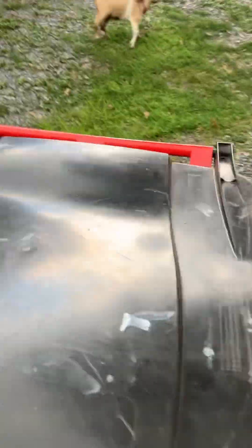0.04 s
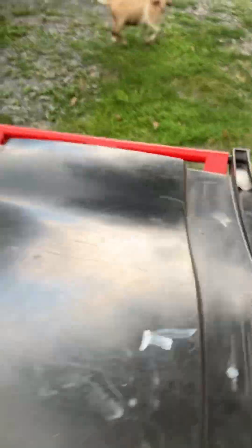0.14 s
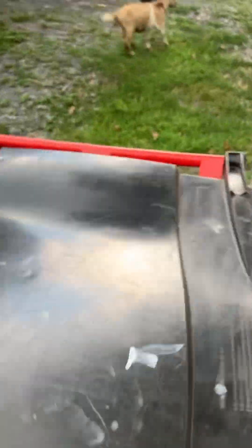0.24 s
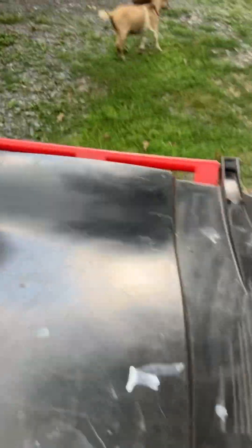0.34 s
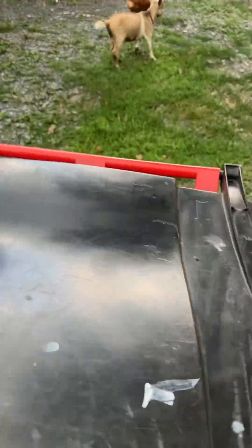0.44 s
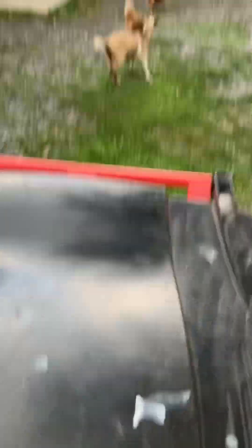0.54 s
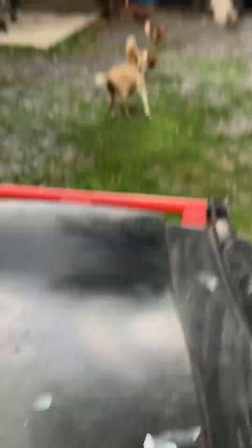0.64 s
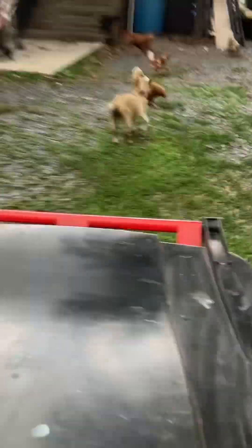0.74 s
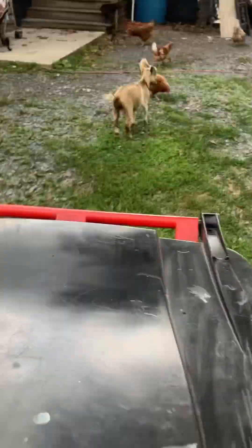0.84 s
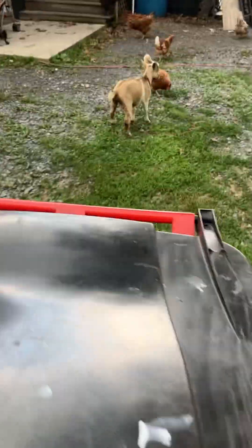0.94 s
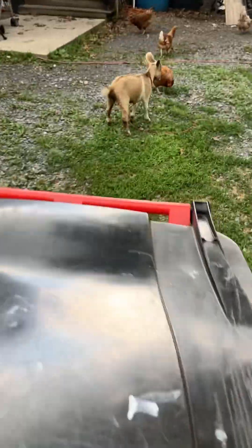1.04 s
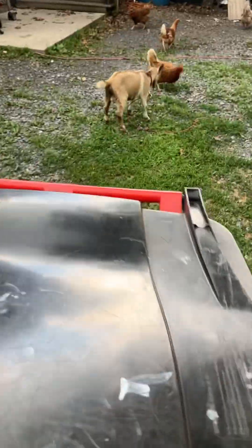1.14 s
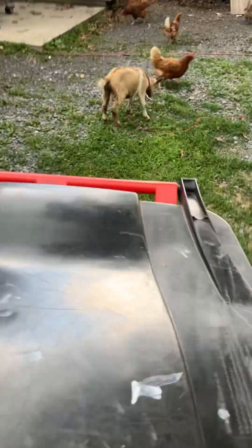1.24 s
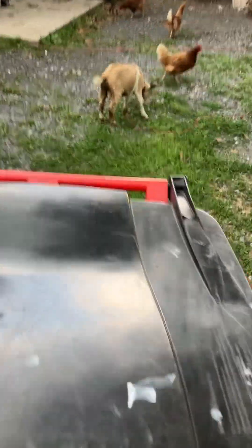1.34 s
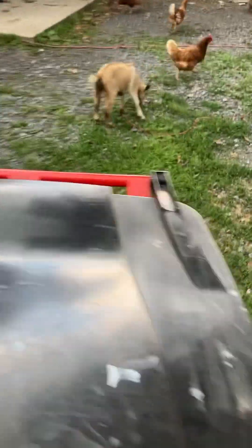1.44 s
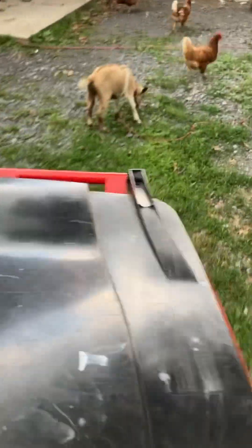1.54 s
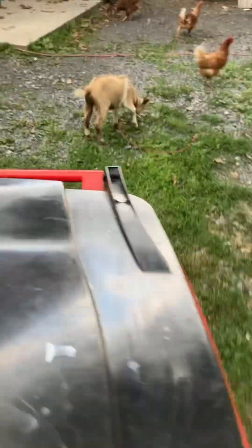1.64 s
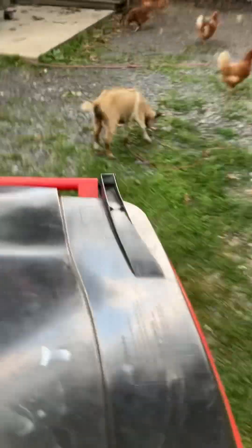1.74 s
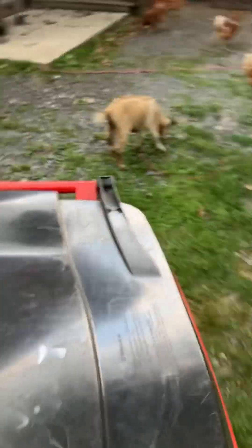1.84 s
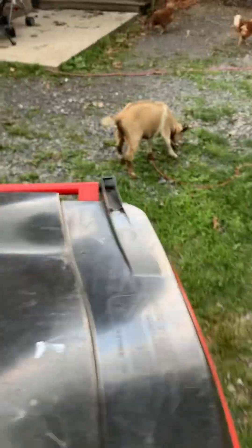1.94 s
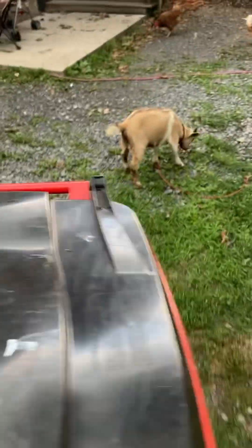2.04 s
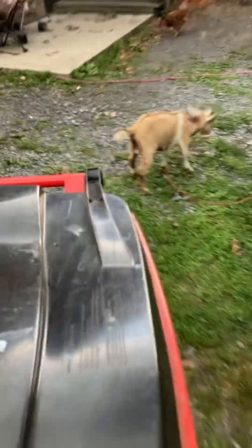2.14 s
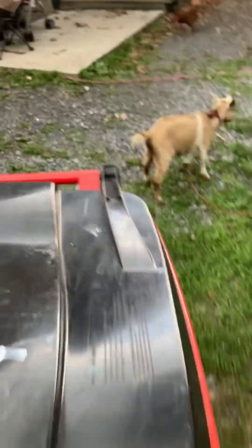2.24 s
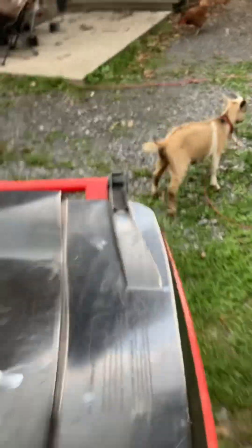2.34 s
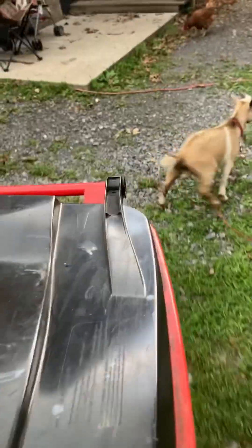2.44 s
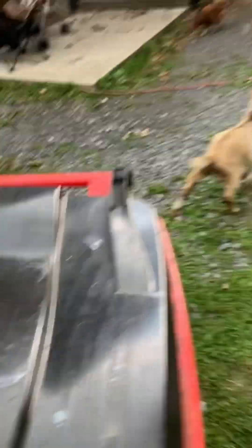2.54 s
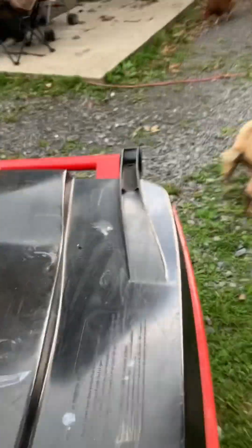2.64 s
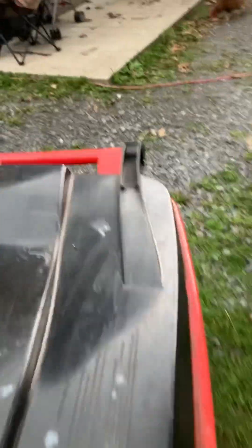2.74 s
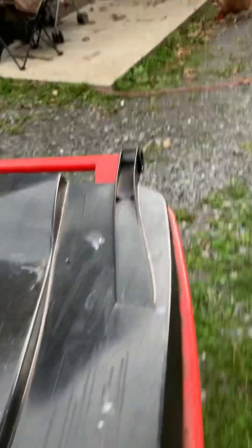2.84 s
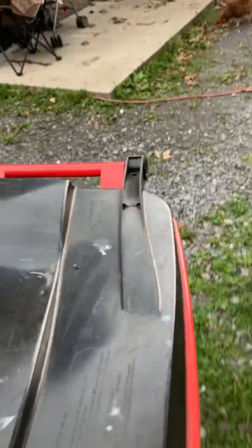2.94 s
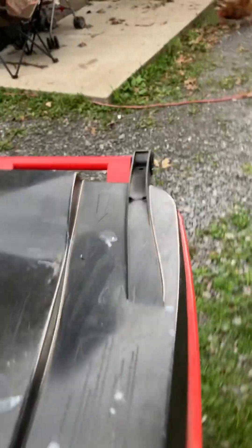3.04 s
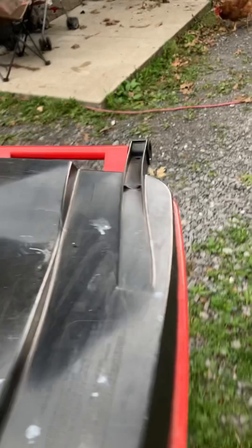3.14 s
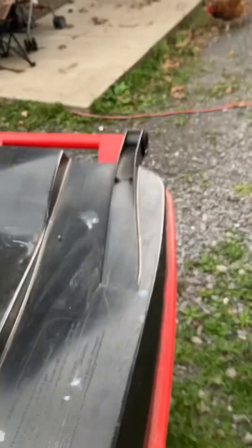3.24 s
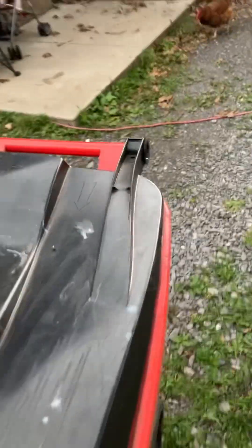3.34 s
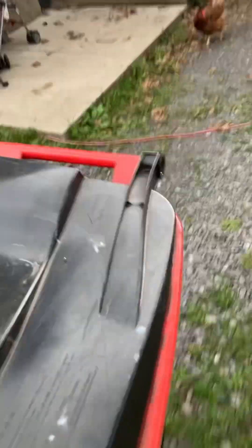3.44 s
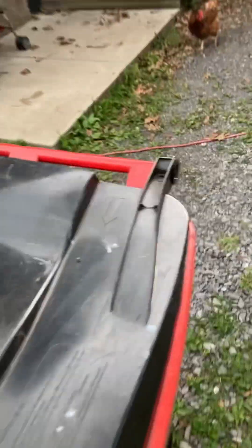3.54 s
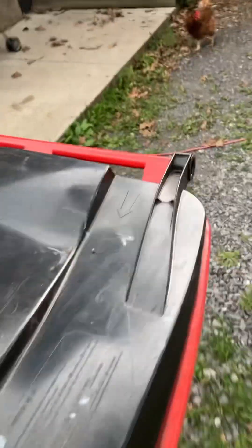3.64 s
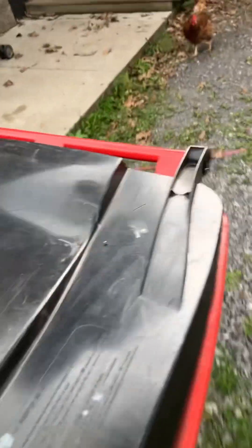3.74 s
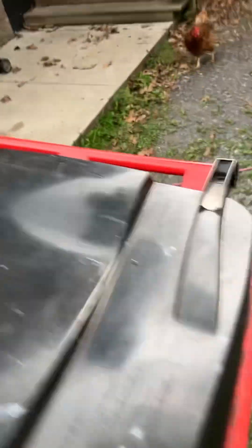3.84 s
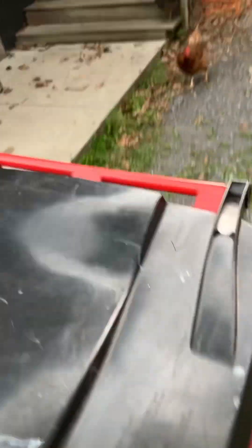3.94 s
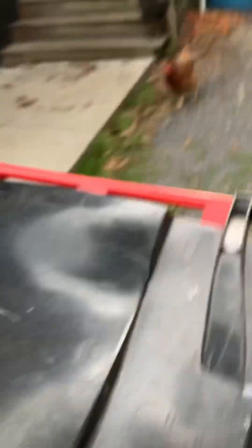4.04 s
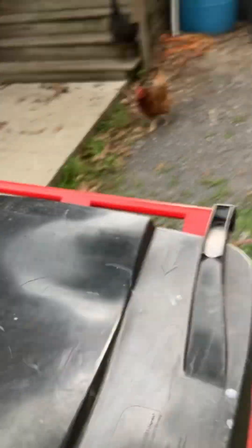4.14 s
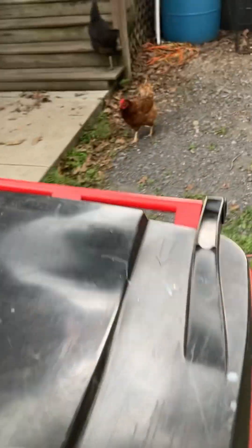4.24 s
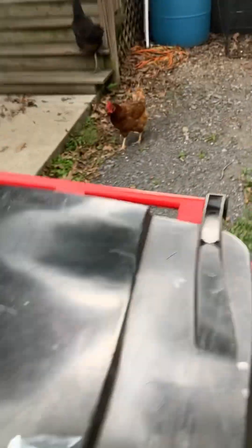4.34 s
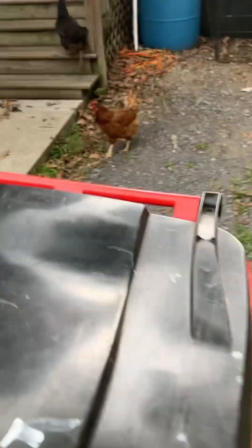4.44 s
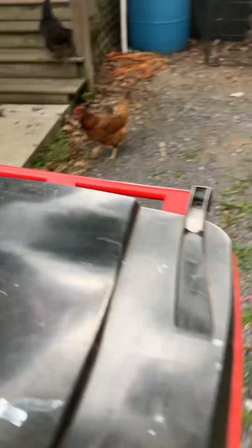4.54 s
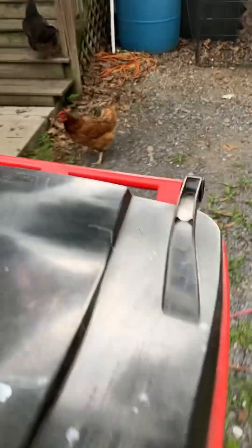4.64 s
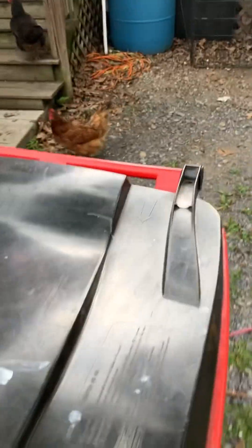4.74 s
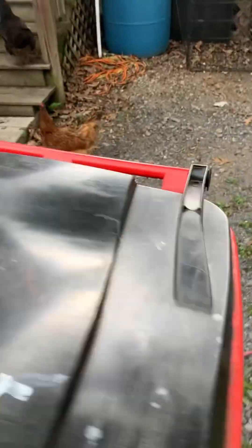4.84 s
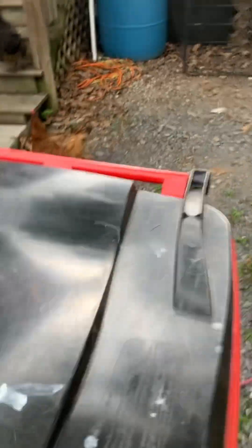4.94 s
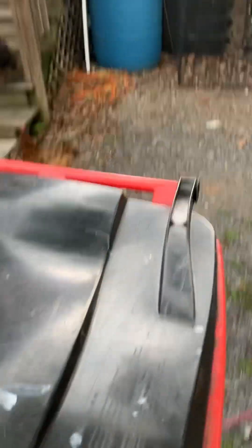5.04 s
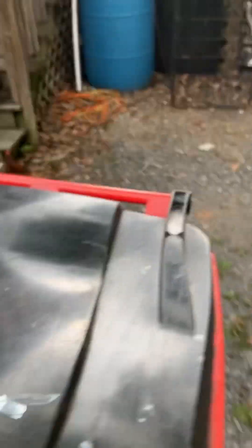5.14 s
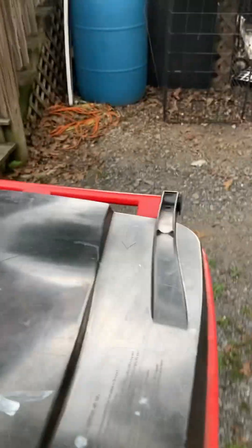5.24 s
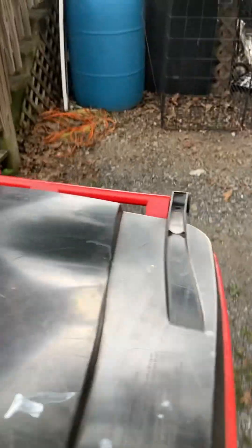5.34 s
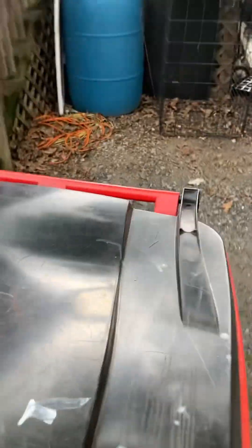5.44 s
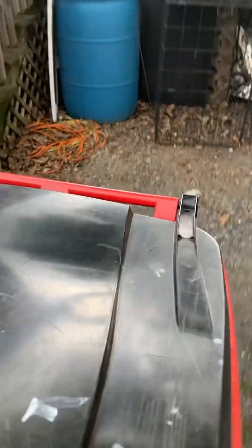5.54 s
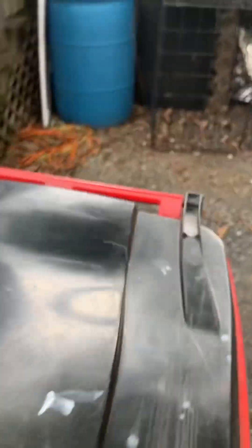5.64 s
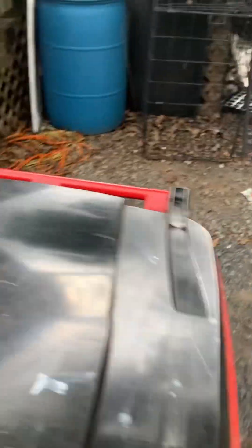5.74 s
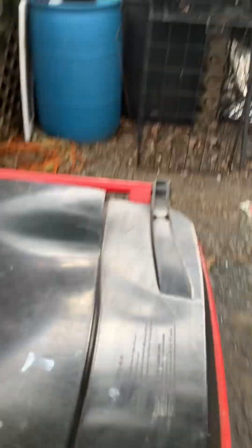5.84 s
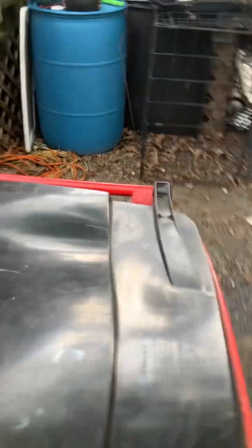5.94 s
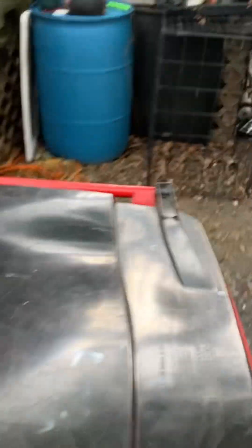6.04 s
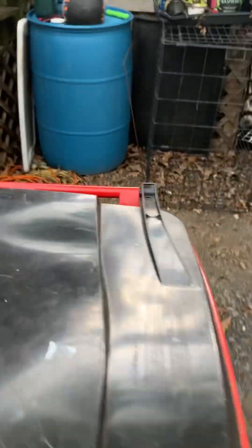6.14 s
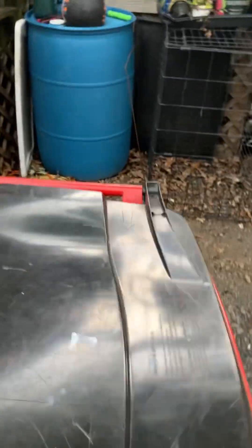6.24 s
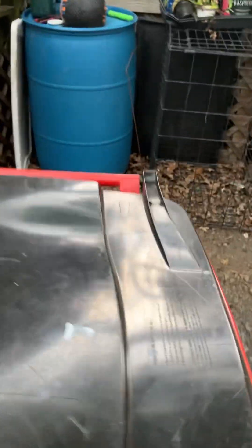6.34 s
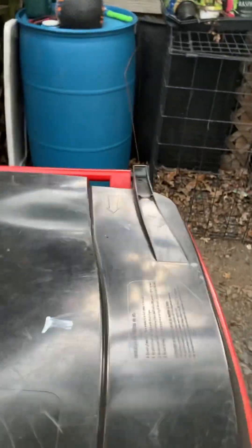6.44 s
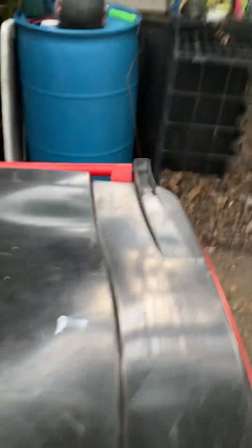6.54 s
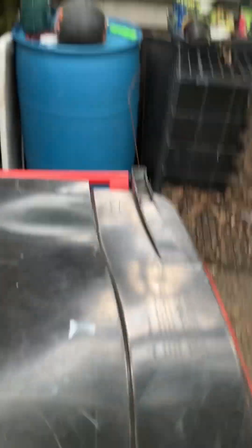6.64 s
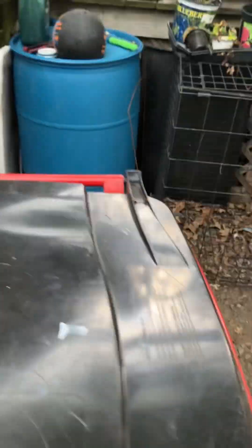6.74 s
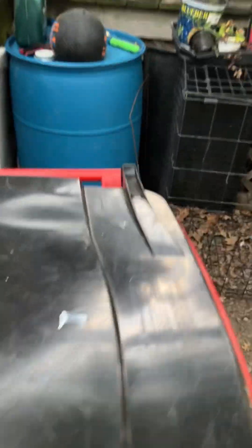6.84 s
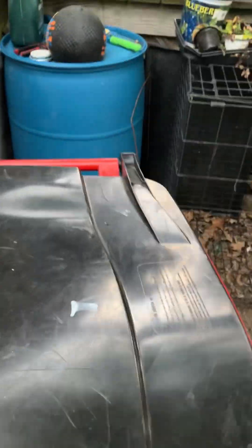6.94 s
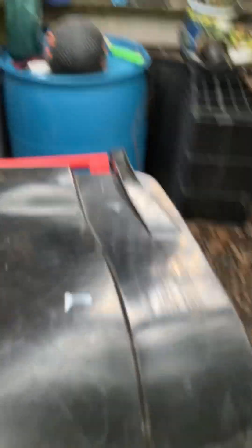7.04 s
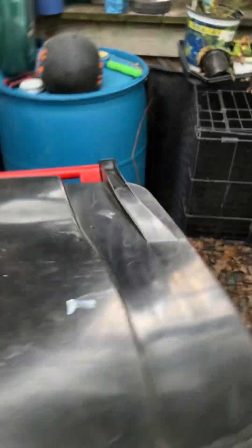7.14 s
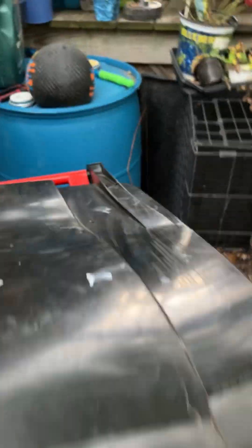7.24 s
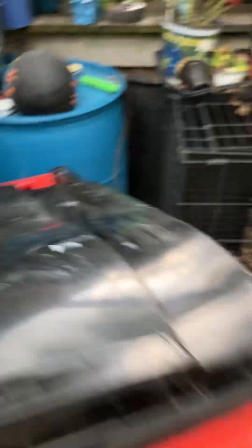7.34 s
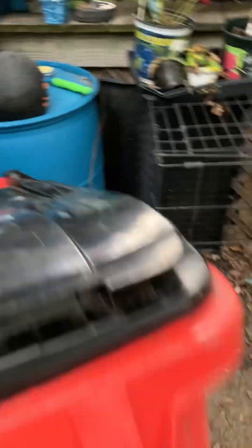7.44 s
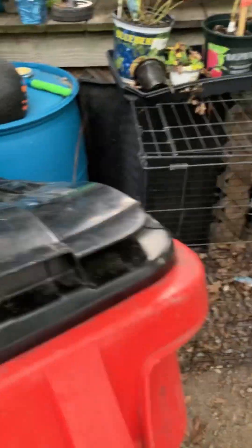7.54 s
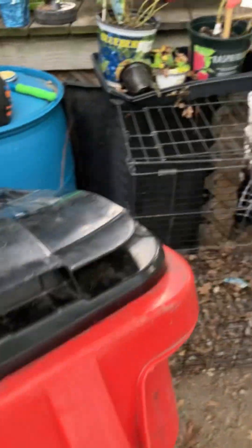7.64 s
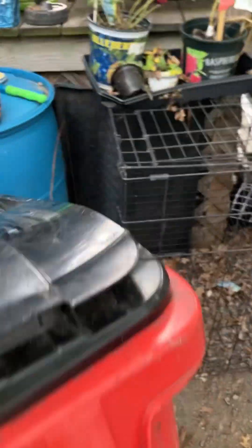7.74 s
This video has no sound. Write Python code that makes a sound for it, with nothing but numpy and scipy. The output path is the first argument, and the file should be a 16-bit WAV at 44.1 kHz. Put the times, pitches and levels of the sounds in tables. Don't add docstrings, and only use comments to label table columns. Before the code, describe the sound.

Close, booming rumble of an empty plastic bin rolled across stones, its lid chattering unevenly, ending in a hollow set-down thud and near silence.

```python
import sys
import numpy as np
from scipy import signal
from scipy.fft import rfft, irfft, next_fast_len
from scipy.io import wavfile
from scipy.ndimage import uniform_filter1d

SR = 44100
rng = np.random.default_rng(int(sys.argv[2]) if len(sys.argv) > 2 else 0)


def volts_from_db(level):
    exponent = np.asarray(level, float) / 20
    return 10 ** exponent


def int16_out(signal):
    q = np.round(np.clip(np.atleast_2d(signal).T, -1, 1) * 32767)
    wavfile.write(sys.argv[1], SR, q.astype(np.int16))


N = 343812
TIME = np.arange(N) / SR


def unit(x):
    return x / np.sqrt(np.mean(x ** 2) + 1e-20)


def along(points, hz):
    f, v = np.transpose(points)
    return np.interp(np.log(hz + 1), np.log(f + 1), v)


def filtered(x, response):
    m = next_fast_len(N + SR // 2)
    return irfft(rfft(x, m) * response(np.fft.rfftfreq(m, 1 / SR)), m)[..., :N]


def modes(table):
    def response(f):
        total = 0
        for k, (centre, width, db) in enumerate(table):
            damping = 1j * f * width
            total = total + (-1) ** k * volts_from_db(db) * damping / (centre * centre - f * f + damping)
        return total
    return response


def colour(points):
    return lambda hz: volts_from_db(along(points, hz))


def in_series(first, second):
    return lambda hz: first(hz) * second(hz)


def jolts(rate, spread_db, t60, rise):
    size_db = spread_db * np.minimum(rng.exponential(size=N), 3)
    sizes = (rng.random(N) < rate / SR) * volts_from_db(size_db)
    power = signal.lfilter([1], [1, -volts_from_db(-120 / (t60 * SR))], sizes ** 2)
    power = uniform_filter1d(power, round(rise * SR) + 1)
    return unit(np.sqrt(np.abs(power) + 1e-6))


def levelled(x, span):
    power = np.mean(x ** 2, 0)
    for _ in range(2):
        power = uniform_filter1d(power, round(span * SR))
    return x / np.sqrt(np.abs(power) + 1e-9)


def pair():
    return rng.standard_normal((2, N))


def patchy(depth_db):
    z = signal.stft(pair(), nperseg=256)[2]
    field = uniform_filter1d(rng.standard_normal(z.shape[1:]), size=6, axis=0)
    field = uniform_filter1d(field, size=7, axis=1)
    return signal.istft(z * volts_from_db(depth_db * unit(field)), nperseg=256)[1][:, :N]


def silence():
    return np.zeros((2, N + SR))


def add_at(out, s, sound):
    start = max(round(s * SR), 0)
    out[:, start:start + sound.shape[-1]] += sound


def struck(hits, partials, rise, t60, apart):
    out, t = silence(), np.arange(SR // 10) / SR
    ratio, level_db = np.transpose(partials)[..., None]
    for s, db, hz in hits:
        size, phase, side = rng.standard_normal((3, len(partials), 1))
        envelope = volts_from_db(db + level_db + 1.5 * size - 60 * t / t60) * (1 - np.exp(-t / rise))
        ring = envelope * np.sin(2 * np.pi * hz * ratio * t + 3 * phase)
        add_at(out, s, np.array([ring.sum(0), (apart * side * ring).sum(0)]))
    return out[:, :N]


# f/Hz, level/dB
YARD_SPECTRUM = [(30, 8), (100, -1), (400, -31), (2000, -19), (8000, -47), (15700, -52)]


def yard():
    return volts_from_db(-67.0) * unit(filtered(pair(), colour(YARD_SPECTRUM)))


# t/s, force level/dB
PUSH_FORCE = [(0.0, -19), (0.5, -21.5), (1.2, -22.5), (1.9, -28), (2.6, -25), (3.3, -19.5), (4.0, -24.5),
              (4.7, -20.5), (5.4, -32), (6.1, -17), (6.8, -29), (7.1, -27), (7.36, -36), (7.6, -41.5),
              (7.8, -49.5)]


def force():
    return np.interp(TIME, *np.transpose(PUSH_FORCE)) + 24


# t of
# the middle/s, length/s, shake level/dB, weight level/dB
GROUND_PATCHES = [(0.172, 0.13, 5.5, 7), (0.539, 0.083, -6.5, 1), (0.896, 0.091, -12, -11),
                  (1.377, 0.34, 5.5, 6), (7.74, 0.45, -3, -9.5), (1.934, 0.26, -5, -2.5),
                  (2.27, 0.55, 6.5, 1), (2.727, 0.14, 6, 3), (2.835, 0.11, 7.5, 8), (2.946, 0.11, -5, -6),
                  (3.5, 0.27, -7, -2.5), (3.693, 0.34, -7.5, -4), (3.861, 0.19, 1.5, -1),
                  (4.09, 0.047, 1.5, -0.5), (4.396, 0.073, 6, 5.5), (4.604, 0.29, -11.5, -6.5),
                  (4.836, 0.19, -10, -1), (4.96, 0.99, 6, -0.5), (5.176, 0.17, -5.5, -0.5),
                  (5.277, 0.11, -3.5, -9), (5.66, 1, 4.5, 5), (5.869, 0.15, -9, -10.5),
                  (5.991, 0.23, -10, -6), (6.07, 0.11, -25.5, -27), (6.176, 0.29, -10.5, -5.5),
                  (6.38, 0.14, 4, -3.5), (6.786, 0.13, 5, -1), (6.891, 0.075, -8.5, 0.5),
                  (7.079, 0.14, 7, -1.5), (7.21, 0.15, 2, -8), (7.332, 0.19, -14.5, -7),
                  (7.457, 0.16, 14.5, 15.5), (7.517, 0.15, 6.5, 2)]


def ground():
    total = np.zeros((2, N))
    for s, length, shake_db, weight_db in GROUND_PATCHES:
        swell = np.cos(np.pi * np.clip((TIME - s) / length, -.5, .5)) ** 2
        total += np.outer([shake_db, weight_db], swell)
    return total


# f/Hz, width/Hz, level/dB
CAVITY_MODES = [(66, 22, 0), (90, 30, -8), (47, 20, -10), (125, 45, -14)]


def boom(push_db, weight_db):
    spectrum = colour([(30, -3), (70, 0), (150, 5), (250, -5)])
    sound = filtered(pair(), in_series(modes(CAVITY_MODES), spectrum))
    return volts_from_db(-23 + 0.51 * push_db + weight_db) * levelled(sound, 0.044)


# f/Hz, width/Hz, level/dB
WALL_MODES = [(194, 17, 0), (172, 30, -10)]
TILT_S, TILT_DB = 5.8, -5.5


def drum(stones, push_db, shake_db):
    spectrum = colour([(80, 21.5), (150, 9), (240, 8.0), (400, -2.0)])
    sound = filtered((0.27 + stones) * pair(), in_series(modes(WALL_MODES), spectrum))
    tilt_db = TILT_DB * np.clip(10 * (TIME - TILT_S), 0, 1)
    return volts_from_db(-21.5 + 0.58 * push_db + 0.5 * shake_db + tilt_db) * levelled(sound, .1)


# f/Hz, width/Hz, level/dB
PANEL_MODES = [(295.2, 60.4, -3.5), (349.7, 42, -0.5), (396.3, 57.5, -1), (523, 104, -4.5),
               (844, 219.5, -4.5), (1350, 490, -18)]
# f/Hz, level/dB
SHELL_SPECTRUM = [(100, -25), (220, 3.5), (400, -1.5), (700, -7), (1100, -13.5), (2000, -0.5), (3000, -8),
                  (5500, -21)]


def rattle(stones, taps, push_db, shake_db):
    drive = (0.84 + stones + 0.59 * taps) * patchy(2.72)
    sound = filtered(drive, in_series(modes(PANEL_MODES), colour(SHELL_SPECTRUM)))
    return volts_from_db(-24 + push_db + shake_db) * levelled(sound, 0.018)


# f/Hz, width/Hz, level/dB
LID_MODES = [(1596, 350, 7), (2794, 146, 1), (3164, 108, 0), (4040, 163, -1), (4400, 570, -5.5),
             (5600, 600, -16)]
STOP_S = 7.33


def chatter(stones, taps, push_db, shake_db):
    contacts = (0.18 + stones) * (0.18 + jolts(rate=110, spread_db=2.5, t60=0.018, rise=.0005))
    spectrum = colour([(900, 3.0), (1500, 4), (6000, 3.5)])
    sound = filtered((contacts + 1.3 * taps) * patchy(2.8), in_series(modes(LID_MODES), spectrum))
    return volts_from_db(-51 + push_db + 1.6 * shake_db) * levelled(sound, 0.38) * (TIME < STOP_S)


def rolling(stones):
    push_db, (shake_db, weight_db) = force(), ground()
    taps = jolts(rate=120, spread_db=1.0, t60=0.0026, rise=0.00024)
    return (boom(push_db, weight_db)
            + drum(stones, push_db, shake_db)
            + rattle(stones, taps, push_db, shake_db)
            + chatter(stones, taps, push_db, shake_db))


# t of the swell's top/s, peak level/dB, length/s
WHEEL_BUMPS = [(0.031, -4.5, 0.042), (0.102, -2.5, 0.0277), (0.163, -10.5, 0.0263), (0.381, 0, 0.028),
               (0.423, -4.5, 0.0248), (0.638, -2, 0.0248), (0.795, -6.5, 0.0211), (1.053, -9.5, 0.0218),
               (1.326, -31, 0.0249), (1.549, -11, 0.01), (2.221, -9, 0.021), (2.304, -2, 0.0092),
               (2.406, -5, 0.028), (2.741, -3, 0.0531), (2.86, -1, 0.0161), (3.016, -7.5, 0.01034),
               (3.283, -14.5, 0.042), (3.505, -7.5, 0.0362), (3.866, -8, 0.0248), (4.397, -6, 0.025),
               (4.478, -4, 0.027), (5.018, -5.5, 0.035), (5.049, -0.5, 0.01), (5.633, -8.5, 0.021),
               (5.779, -8, 0.0333), (6.278, -7, 0.026), (6.458, -4.5, 0.0242), (6.795, -8.5, 0.0373),
               (7.45, -7.5, 0.023)]


def bumps():
    wall, t = silence(), np.arange(SR // 8) / SR
    for s, db, length in WHEEL_BUMPS:
        pitch, phase = rng.standard_normal(2)
        swell = np.sin(np.pi * np.clip(t / (1.6 * length), 0, 1)) ** 0.5
        tone = np.sin(2 * np.pi * 194 * (1 + .015 * pitch) * t + 3 * phase)
        add_at(wall, s - 0.89 * length, volts_from_db(db - 5.0) * swell * tone * [[1], [.15]])
    return wall[:, :N]


# t of the start/s, hold/s, grit level/dB, leaf brightness level/dB
CRUSH_BURSTS = [(0.01, 0.15, 9, 1), (0.15, 0.071, 9, -16), (0.57, 0.24, 5, -6.5), (0.99, 0.018, -9, 12.5),
                (1.098, 0.3, 4, -0.5), (1.535, 0.2, 9, -2), (2.203, 0.19, 6, -8), (2.489, 0.16, 5.5, -3),
                (2.732, 0.078, 7.5, 4), (3.043, 0.19, 3.5, -1), (3.245, 0.019, 12.5, -16),
                (3.664, 0.18, 3, 5.5), (4.176, 0.06, 9.5, -1), (4.323, 0.19, 3.5, -5),
                (4.559, 0.24, 7, 2.5), (4.886, 0.13, 6.5, -2.5), (5.214, 0.16, 5.5, 3.5),
                (5.674, 0.022, 7, -7), (5.856, 0.067, 6, 1), (6.245, 0.022, 10.3, -5),
                (6.31, 0.11, 6.5, -7), (6.554, 0.066, 7.5, -5), (6.646, 0.17, 2.5, -1),
                (6.734, 0.33, 5, 3.5), (6.91, 0.04, 11.5, -9), (7.032, 0.08, 6.5, -5),
                (7.389, 0.052, 14, -5), (7.698, 0.048, 5.5, -6)]


def crushing():
    rise_s, settle_s = 0.0063, 0.032
    total = np.zeros((2, N))
    for s, hold, grit_db, leaf_db in CRUSH_BURSTS:
        onset = (TIME - s) / rise_s
        settling = 1 + (s + hold - TIME) / settle_s
        total += np.outer([grit_db, leaf_db], np.clip(np.minimum(onset, settling), 0, 1))
    return total


# f/Hz, level/dB
GRIT_SPECTRUM = [(1500, 2.5), (3500, -2.5), (5500, -1.5), (8500, 0), (10000, -6), (12500, -20),
                 (15700, -17)]


def crunch(stones):
    burst_db, leaf_db = crushing()
    grit_db = -52.5 + 0.15 * force() + burst_db
    grains = 0.23 + 2.0 * stones + jolts(rate=160, spread_db=-6.5, t60=0.02, rise=0.00032)
    grit = filtered(grains * patchy(2.2), colour(GRIT_SPECTRUM))
    crisp = .3 + 0.55 * grains + jolts(rate=96, spread_db=1.0, t60=0.0079, rise=.0003)
    leaf_spectrum = colour([(8000, -12), (11000, 1.0), (13700, -2.5), (15700, -8.5)])
    leaves = filtered(crisp * patchy(7.2), leaf_spectrum)
    return volts_from_db(grit_db) * levelled(grit, 0.053) + volts_from_db(grit_db + leaf_db - 5) * levelled(leaves, 0.041)


# t/s, peak level/dB, f/Hz
AXLE_KNOCKS = [(0.046, -24, 540), (0.067, -13.5, 530), (0.148, -11, 475), (0.301, -16, 880),
               (0.331, -12.5, 478), (0.387, -9.5, 490), (0.62, -14, 937), (0.793, -12.5, 602),
               (1.027, -16, 512), (1.375, -21, 764), (1.406, -12.5, 490), (2.098, -10, 562),
               (2.192, -23, 500), (2.231, -17.5, 880), (2.244, -9.5, 804), (2.278, -11, 758),
               (2.308, -10, 910), (2.332, -14.5, 549), (2.354, -10.5, 845), (2.39, -15, 720),
               (2.414, -14.5, 703), (2.471, -14, 537), (2.533, -14.5, 487), (2.611, -23.5, 915),
               (2.683, -16, 527), (2.713, -11, 506), (2.803, -6, 529), (2.846, -14, 534),
               (3.006, -10.5, 496), (3.035, -14, 827), (3.12, -16, 480), (3.226, -23, 484),
               (3.255, -6, 494), (3.634, -16, 683), (3.68, -14, 490), (3.757, -14, 530), (3.797, -15, 480),
               (4.058, -22, 500), (4.374, -16, 515), (4.44, -14, 623), (4.688, -14, 500), (4.725, -20, 823),
               (4.926, -10, 823), (4.993, -22, 567), (5.517, -9, 462), (5.605, -11, 528), (5.681, -10, 506),
               (5.874, -20, 480), (7.462, -15, 620), (6.249, -11.5, 826), (6.412, -15.5, 497),
               (6.476, -14, 550), (6.516, -11.5, 533), (6.618, -21.5, 820), (6.764, -17, 494),
               (6.912, -18.5, 768), (0.661, -18.5, 940), (7.406, -5.5, 505)]


def knocks():
    puff, t = silence(), np.arange(SR // 20) / SR
    for s, db, _ in AXLE_KNOCKS:
        add_at(puff, s, volts_from_db(db - 6.0 - 60 * t / 0.12) * rng.standard_normal((2, len(t))))
    partials = [(1, -5), (1.25, -7), (1.7, -10), (2.4, -15)]
    ring = struck(AXLE_KNOCKS, partials, rise=.0008, t60=.04, apart=.6)
    puff_spectrum = colour([(350, 8.0), (850, 9), (1600, -8.0), (2500, -7.5), (4000, -35)])
    return ring + filtered(puff[:, :N], puff_spectrum)


# t/s, peak level/dB, f/Hz
PANEL_THUDS = [(0.07, -11, 395), (0.143, -18, 392), (0.223, -15, 287), (0.33, -33, 400),
               (0.364, -6.5, 373.5), (0.617, -9, 286), (0.708, -32, 325), (0.937, -11.5, 329),
               (1.224, -18, 320), (1.737, -20, 359), (2.229, -13, 420), (2.29, -9, 380), (2.375, -15, 340),
               (2.556, -13, 299), (2.609, -11, 337), (2.819, -9.5, 317), (2.989, -14, 409),
               (3.055, -15, 273), (3.145, -26, 304), (3.471, -11.5, 278), (3.635, -16, 420),
               (3.794, -14, 418), (3.837, -15.5, 301), (3.973, -12, 288), (4.337, -20, 373),
               (4.375, -3.5, 329.4), (4.631, -12.5, 287), (4.686, -11.5, 357), (4.883, -11, 425),
               (4.986, -10, 287), (5.759, -13, 339), (5.872, -15, 419), (6.26, -21.5, 405),
               (6.328, -21, 337), (6.413, -12.5, 350), (6.706, -14.5, 288), (6.771, -9, 297),
               (6.809, -15.5, 295), (7.052, -11.5, 305), (7.408, -8.5, 265.5)]


def thuds():
    return struck(PANEL_THUDS, [(1, -1.5), (1.22, -8.5)], rise=0.0017, t60=0.1, apart=.4)


# t/s, lid level/dB, shell level/dB
RIM_TAPS = [(0.188, -19, -31), (0.076, -33, -14), (0.1255, -39, -29), (0.2986, -41, -35),
            (0.3974, -34, -16.5), (0.459, -38, -40), (0.7005, -31.5, -23), (0.7265, -42, -44),
            (0.8294, -43, -24), (1.145, -34, -23), (1.211, -49, -21), (1.363, -31, -26), (1.405, -30, -33),
            (1.523, -32.5, -35), (2.034, -31, -28), (2.097, -54, -39), (2.1865, -37, -34),
            (2.2783, -29, -19), (2.356, -33, -35), (2.4977, -29, -33), (2.608, -37, -39),
            (2.6424, -32.5, -24.5), (2.7087, -38, -37), (2.7875, -42, -30), (2.9432, -37, -30),
            (3.0362, -30.5, -28), (3.063, -42, -17.5), (3.1655, -39, -14), (3.1885, -37, -18.5),
            (3.6517, -36, -25), (3.6663, -38, -33), (3.7232, -45, -33.5), (3.837, -33, -16),
            (3.8563, -42, -23.5), (3.879, -30, -26), (3.93, -38.5, -39), (3.9928, -56, -28),
            (4.0563, -37, -26), (4.089, -29.5, -18.5), (4.108, -29, -27), (6.184, -37, -30),
            (5.903, -36, -39), (4.4506, -36, -18.5), (4.7124, -42, -32), (4.769, -29, -20),
            (4.9698, -31, -23.5), (4.9922, -28, -18), (5.019, -28, -32), (5.056, -34, -26),
            (5.842, -39, -34), (5.483, -56, -38), (5.6672, -33, -25), (5.762, -32, -21), (5.8726, -34, -28),
            (6.1115, -38, -33.5), (6.321, -50, -23), (6.411, -31, -19.5), (6.639, -28.5, -33),
            (6.721, -33.5, -24.5), (7.1062, -49, -29)]


def pings():
    lid, shell, t = silence(), silence(), np.arange(SR // 15) / SR
    lid_decay = volts_from_db(-60 * t / 0.014) + volts_from_db(-11 - 60 * t / 0.077)
    for s, lid_db, shell_db in RIM_TAPS:
        noise = rng.standard_normal((2, 2, len(t))) * (1 - np.exp(-t / 0.00022))
        add_at(lid, s, volts_from_db(lid_db + 7.5) * lid_decay * noise[0])
        add_at(shell, s, volts_from_db(shell_db + 11.5 - 60 * t / 0.14) * noise[1])
    lid_response = modes([(3010, 290, 5.5), (4130, 330, -9), (2500, 330, -13)])
    shell_spectrum = colour([(500, 3), (900, -2.0), (1700, -9.5), (2400, -17), (4000, -56.0)])
    return filtered(lid[:, :N], lid_response) + filtered(shell[:, :N], shell_spectrum)


def slaps(hits, tick_colour):
    lid, buzz, tick = silence(), silence(), silence()
    t = np.arange(SR // 20) / SR
    hz, width, db = np.transpose(LID_MODES)[..., None]
    rise = 1 - np.exp(-t / .0013)
    decay = np.exp(-np.pi * 1.3 * width * t)
    for s, lid_db, tick_db in hits:
        noise = rng.standard_normal((3, 2, len(t)))
        size, shift, *phase = rng.standard_normal((4, len(LID_MODES), 1))
        turn = 2 * np.pi * hz * (1 + 0.025 * shift) * t + 3 * np.array(phase)
        ring = np.sum(volts_from_db(lid_db + db - 3.5 + 2 * size) * decay * np.sin(turn), axis=1)
        crack = volts_from_db(lid_db - 4.5 - 60 * t / 0.017) * noise[0]
        add_at(lid, s, rise * (ring + crack))
        add_at(buzz, s, rise * volts_from_db(lid_db - 3.5 - 60 * t / 0.099) * noise[1])
        add_at(tick, s, volts_from_db(tick_db + 8.0 - 60 * t / 0.011) * noise[2])
    lid = lid[:, :N] + filtered(buzz[:, :N], modes(LID_MODES))
    lid_spectrum = colour([(600, 21.0), (1500, 2.5), (5000, -6.0), (8000, -31)])
    return filtered(lid, lid_spectrum) + filtered(tick[:, :N], colour(tick_colour))


# t/s, lid level/dB, tick level/dB
LID_CLACKS = [(.1028, -13.5, -40), (.1407, -13.5, -26.5), (.1671, -7.5, -20), (.1766, -14.5, -37),
              (.3322, -15, -33), (.424, -19.5, -34), (.6266, -17.5, -36), (.7678, -17.5, -41),
              (.9518, -17, -31.5), (1.2736, -16, -35), (2.2304, -13, -29), (2.3068, -14, -35),
              (2.5317, -16, -35), (2.7991, -11, -32.5), (2.8216, -17.5, -30), (3.1239, -16, -43),
              (3.1449, -14.5, -45), (3.2541, -9.5, -27), (3.6342, -19, -34.5), (3.8058, -17, -39),
              (4.3601, -16.5, -42), (4.3935, -19, -33), (4.4798, -18.5, -37), (4.8969, -18.5, -31),
              (5.6806, -18, -30.5), (5.7784, -21, -42), (6.2563, -13, -39), (6.2648, -28, -31),
              (7.521, -36, -52)]
# f/Hz, level/dB
PLASTIC_TICK = [(3500, 4), (6000, -0.5), (10000, -5.5), (15700, -26)]


def clacks():
    return slaps(LID_CLACKS, PLASTIC_TICK)


# t/s, lid level/dB, tick level/dB
STONE_FLICKS = [(0.573, -45, -38.5), (1, -46, -34.5), (1.1032, -30, -32), (3.994, -50, -39),
                (1.187, -47, -48), (2.366, -17.5, -40), (3.1718, -36, -38), (2.73, -42, -32),
                (2.8545, -54, -34.5), (3.701, -56, -29), (3.756, -24, -38), (3.942, -42, -32),
                (4.216, -41, -36), (4.4236, -41, -37), (4.6249, -48, -29.5), (4.6863, -26, -28),
                (4.9178, -35, -30), (5.075, -40, -39), (5.2844, -60, -33), (5.519, -22, -31),
                (5.5527, -17.5, -37), (5.6425, -20, -32), (5.705, -18, -35), (6.2857, -19.5, -34.5),
                (6.546, -23, -37), (6.617, -24, -46), (6.7698, -18, -32), (6.9445, -26, -45),
                (7.0824, -19, -46), (7.403, -34, -43)]
# f/Hz, level/dB
STONE_SPECTRUM = [(3500, -22), (6000, -4), (10000, -1), (15700, -15)]


def flicks():
    return slaps(STONE_FLICKS, STONE_SPECTRUM)


# t/s, length/s, f/Hz, width/Hz, level/dB
BODY_SCRAPES = [
    (0.73, 0.13, 2340, 300, -36.5),
    (6.9, 0.44, 152, 37, -30),
    (7.368, 0.11, 1120, 1230, -27),
    (5.91, 0.16, 1200, 780, -41),
    (7.402, 0.056, 450, 720, -23),
    (7.49, 0.24, 139, 90, -31.5),
    (7.441, 0.13, 720, 800, -32.5),
    (7.61, 0.041, 1010, 1510, -47.5),
    (7.693, 0.05, 550, 820, -41),
    (7.767, 0.028, 670, 900, -45),
]


def scrapes():
    out = silence()
    for s, length, hz, width, db in BODY_SCRAPES:
        n = round(length * SR)
        rough = rng.standard_normal((2, n))
        for _ in range(2):
            rough = signal.lfilter(*signal.iirpeak(hz, hz / width, SR), rough)
        add_at(out, s, volts_from_db(db) * unit(rough) * np.hanning(n) ** .55)
    return out[:, :N]


def cracks(hits, tint):
    out, t = silence(), np.arange(SR // 50) / SR
    for s, db in hits:
        add_at(out, s, volts_from_db(db + 4.5 - 60 * t / 0.0092) * rng.standard_normal((2, len(t))))
    return filtered(out[:, :N], colour(tint))


# t/s, peak level/dB
GRAIN_SNAPS = [(0.9867, -38), (1.5574, -23.5), (1.6995, -30), (1.8936, -38), (2.2772, -30.5), (2.6045, -31),
               (2.749, -26), (2.9652, -33), (3.4126, -32), (4.0547, -33), (4.1899, -44), (4.592, -32),
               (5.5842, -33), (6.9117, -46), (7.3657, -43), (7.3896, -38), (7.5423, -35), (7.642, -50),
               (7.275, -41.5)]


def snaps():
    return cracks(GRAIN_SNAPS, [(4000, -25), (8000, -0.5), (11000, -4.0), (15700, -12.5)])


# t/s, peak level/dB
LEAF_SPLITS = [
    (0.9996, -31),
    (1.1867, -29.5),
    (2.8539, -28),
    (4.6838, -38),
    (5.2844, -35),
]


def splits():
    return cracks(LEAF_SPLITS, [(9000, -24), (13500, 3)])


# f/Hz, correlation
PORT_LIKENESS = [(40, 0.86), (200, 0.99), (400, 0.95), (650, 0.54), (900, 0.86), (2300, 0.42), (4500, 0.54),
                 (15000, 1)]
# f/Hz, left minus right level/dB
PORT_LEAN = [(60, -0.5), (200, -1.5), (380, 0), (700, -2), (1300, -2), (2500, 0)]
# f/Hz, phase/rad
PORT_PHASE = [(550, 0), (2350, 2.6), (2850, 1), (4700, 2.8), (5500, 3.14), (8600, 6.28), (11800, 9.42),
              (15200, 12.57)]


def two_ports(parts):
    def weights(hz):
        turn = np.arccos(np.clip(along(PORT_LIKENESS, hz), -1, 1)) / 2
        return np.array([np.cos(turn), np.sin(turn)])

    def port_response(hz):
        side = np.array([[.5], [-.5]])
        lead = np.interp(hz, *np.transpose(PORT_PHASE))
        return volts_from_db(side * along(PORT_LEAN, hz)) * np.exp(1j * side * lead)

    shared, apart = filtered(parts, weights)
    return filtered(np.array([shared + apart, shared - apart]), port_response)


def scene():
    stones = jolts(rate=120, spread_db=-0.5, t60=0.045, rise=0.023)
    parts = yard() + rolling(stones) + bumps() + crunch(stones) + knocks() + thuds() + pings()
    parts = parts + clacks() + flicks() + scrapes() + snaps() + splits()
    return two_ports(parts)


def low_pass(x):
    return signal.sosfilt(signal.butter(12, 16500, fs=SR, output="sos"), x)


def record(dry):
    soft = dry / (1 + np.abs(dry / 1.1) ** 6) ** (1 / 6)
    low_hz, top_hz = 29, 15900
    band = lambda hz: (hz < top_hz) * hz ** 4 / (hz ** 4 + low_hz ** 4)
    mix = filtered(soft, band)
    return low_pass(mix)


dry = scene()
out = record(dry)
int16_out(out)
```